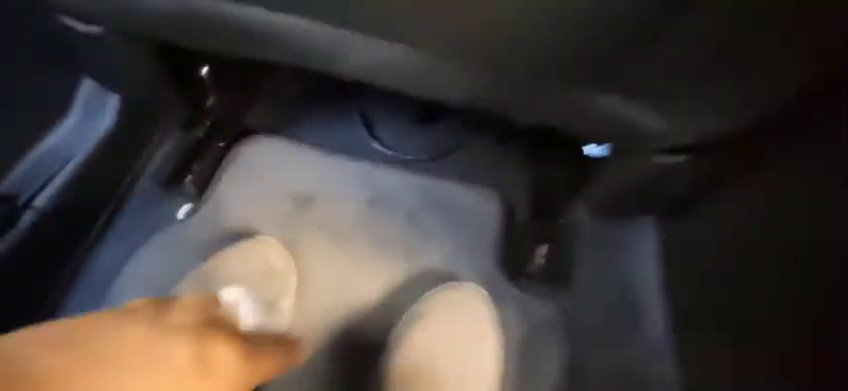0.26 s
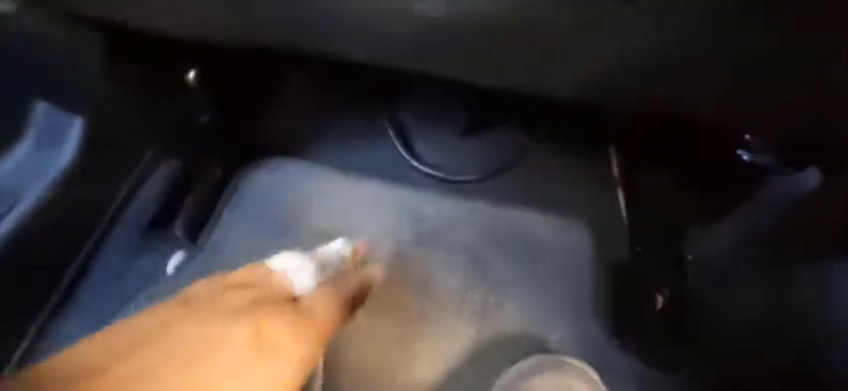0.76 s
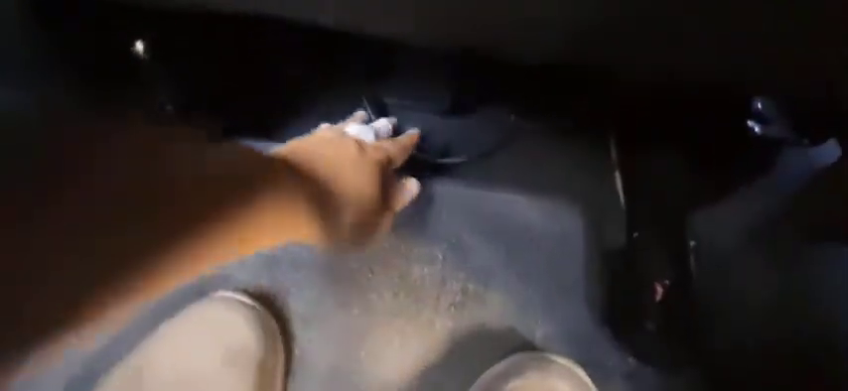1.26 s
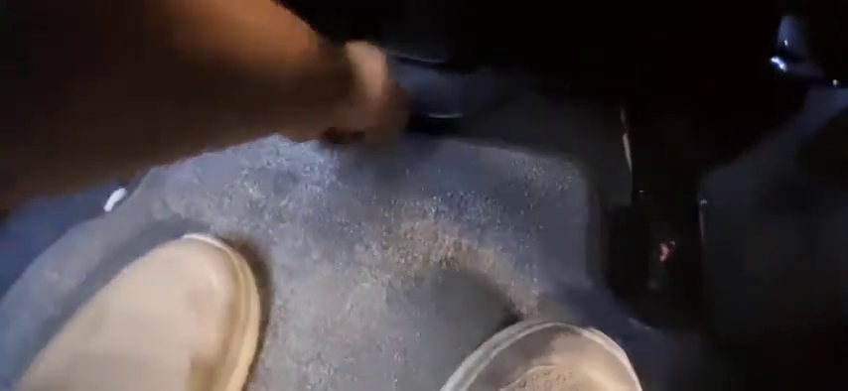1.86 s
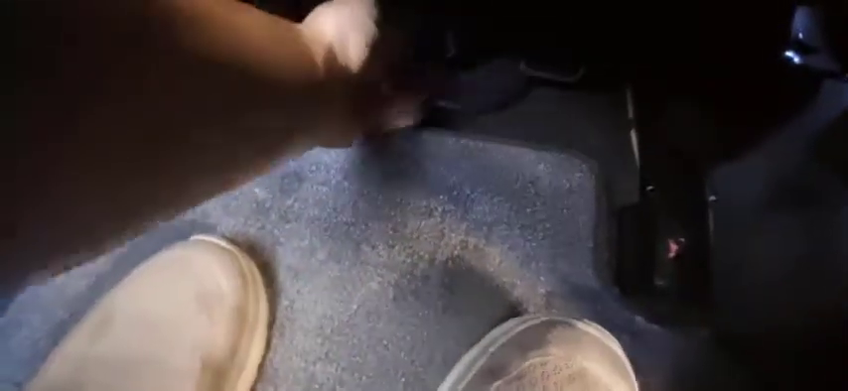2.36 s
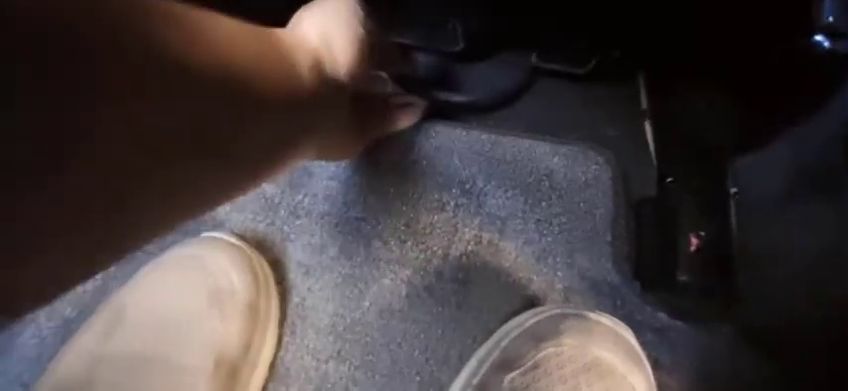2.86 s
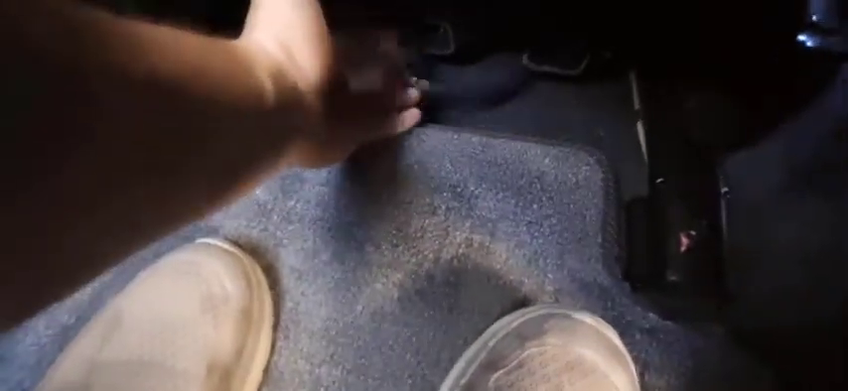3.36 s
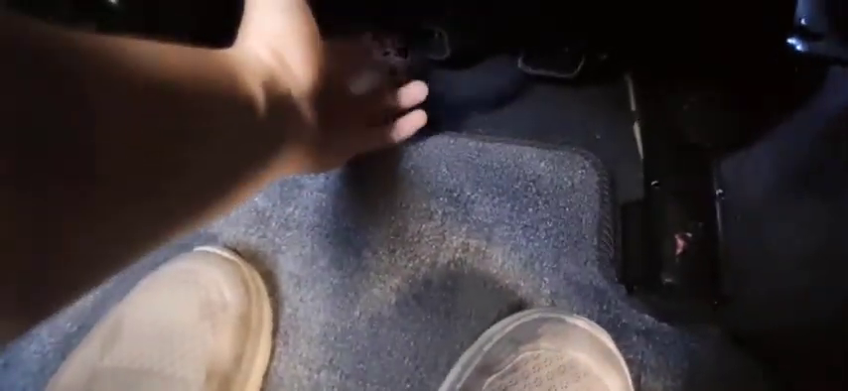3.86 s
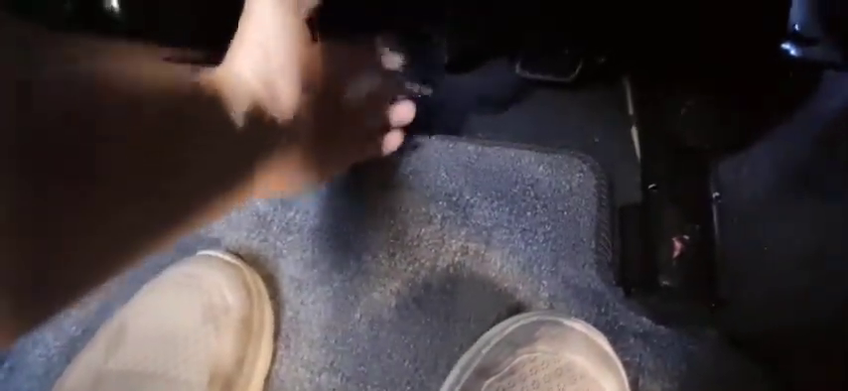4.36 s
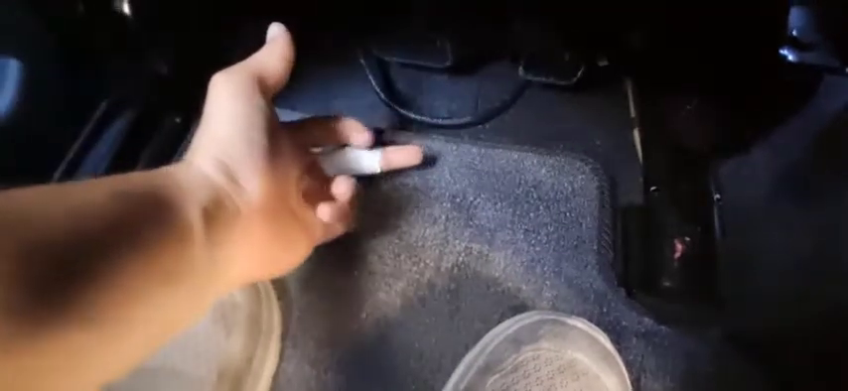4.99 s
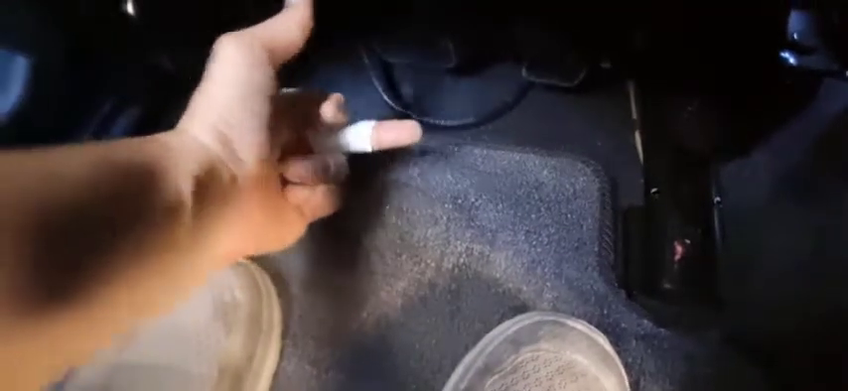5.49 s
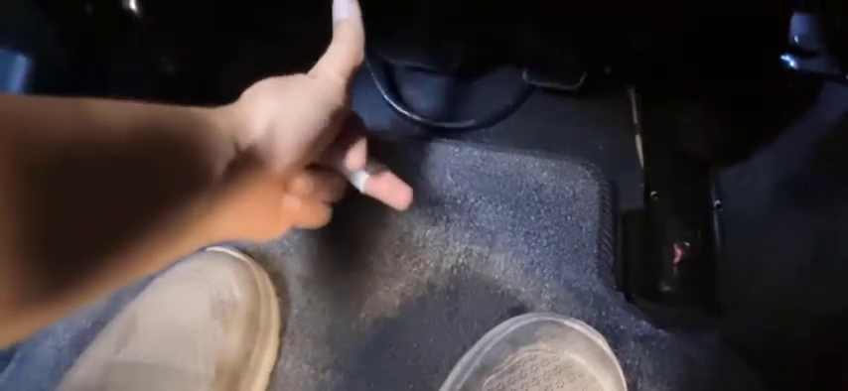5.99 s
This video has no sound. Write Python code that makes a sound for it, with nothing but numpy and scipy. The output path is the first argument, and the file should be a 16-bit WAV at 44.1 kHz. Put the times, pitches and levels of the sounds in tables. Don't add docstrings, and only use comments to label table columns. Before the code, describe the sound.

A small, damped car cabin, heard very close through a handheld stereo microphone. From 0 to 0.6 seconds cloth rubs briskly with a faint tight-fold squeak, over grip rumble and quick low bumps. Between 0.7 and 1.1 come clustered knuckle thuds and small plastic snaps. Fabric keeps brushing until, at about 1.53, a plastic clip lets go with a loud bright crack, with lesser cracks near 1.65 and 1.72. Around 2.08 a strong hollow knock and raspy scrape hit the panel, with a brief metallic ring; more bumps and dragging follow to 2.45. A sleeve strokes softly from 2.5 to 3.25. Dull boomy taps fall at 3.04, 3.32, 3.57, 3.83 and 4.05, with thin clicks between, then the hardest at 4.31. Faint cloth movement fades by 5.9, leaving low hum and hiss, slightly deeper on the left from about 6.

```python
import sys
import numpy as np
from scipy import signal
from scipy.fft import rfft, irfft, next_fast_len
from scipy.io import wavfile
from scipy.ndimage import uniform_filter1d, map_coordinates

SR = 44100
rng = np.random.default_rng(int(sys.argv[2]) if len(sys.argv) > 2 else 0)


def digitize_waveform(pressure):
    field = np.atleast_2d(pressure).T
    bounded = np.clip(field, -1, 1)
    quanta = np.round(bounded * 32767).astype(np.int16)
    wavfile.write(sys.argv[1], SR, quanta)


def amplitude_ratio(level_db):
    exponent = np.asarray(level_db, float) / 20
    return 10 ** exponent


N = 274728
TIME = np.arange(N) / SR


def clock(seconds):
    return np.arange(int(SR * seconds)) / SR


def onset(t, rise_s):
    return 1 - np.exp(-t / rise_s)


def decay(t, t60):
    return amplitude_ratio(-60 * t / t60)


def unit(x):
    return x / np.sqrt(np.mean(x ** 2) + 1e-20)


def along(points, hz):
    f, v = np.transpose(points)
    return np.interp(np.log(hz + 1), np.log(f + 1), v)


def over_time(rows):
    return np.interp(TIME, *np.transpose(rows))


def wobble(rate):
    knots = rng.standard_normal(int(N * rate / SR) + 4)
    return map_coordinates(knots, [np.arange(N) * rate / SR])


def filtered(x, response):
    n = x.shape[-1]
    m = next_fast_len(n + 8192)
    return irfft(rfft(x, m) * response(np.fft.rfftfreq(m, 1 / SR)), m)[..., :n]


def coloured(x, spectrum):
    return unit(filtered(x, lambda hz: amplitude_ratio(along(spectrum, hz))))


def low_cut(x, corner_hz):
    return filtered(x, lambda hz: hz ** 2 / (hz ** 2 + corner_hz ** 2))


def add(track, s, sound):
    part = track[..., round(s * SR):][..., :sound.shape[-1]]
    part += sound[..., :part.shape[-1]]


# frequency in Hz, left-right likeness from -1 to 1.
PORT_LIKENESS = [(60, 0.82), (150, 0.96), (380, 0.72), (950, -0.07), (2380, -0.066), (5980, -0.13),
                 (15000, -0.028)]


def rub(spectrum, patchy_db, grain_db, grain_rate):
    z = signal.stft(rng.standard_normal((2, N)), nperseg=512)[2]
    patches = uniform_filter1d(rng.standard_normal(z.shape[1:]), size=6, axis=0)
    patches = uniform_filter1d(patches, size=10, axis=1)
    pair = signal.istft(z * amplitude_ratio(patchy_db * unit(patches)), nperseg=512)[1][:, :N]
    pair = pair * amplitude_ratio(grain_db * wobble(grain_rate))

    def blend(hz):
        turn = np.arccos(np.clip(along(PORT_LIKENESS, hz), -1, 1)) / 2
        return np.array([np.cos(turn), np.sin(turn)])

    mid, side = filtered(pair, blend)
    return coloured(np.array([mid + side, mid - side]), spectrum)


def ring(modes, t):
    out = 0
    for (hz, db, t60), change_db in zip(modes, 1.5 * rng.standard_normal(len(modes))):
        out = out + amplitude_ratio(db + change_db) * decay(t, t60) * np.sin(2 * np.pi * hz * t)
    return out


# frequency in Hz, width in Hz, level in dB.
TRIM_SHELL = [(304, 98, 9.5), (468, 39, 9), (666, 12, 13.5), (788, 24, -7.5), (970, 60, -12.5),
              (1157, 73, -12), (1450, 55, -6.5), (1640, 32, -11), (2075, 38, -3.5), (2200, 32, -21),
              (2590, 40, -29)]


def hollow(x):
    def shell(f):
        return sum(amplitude_ratio(db) * 1j * f * w / (c * c - f * f + 1j * f * w) for c, w, db in TRIM_SHELL)
    return unit(filtered(x, shell))


def narrow(hz, width_hz):
    slow = rng.standard_normal((2, 2, len(hz)))
    slow = filtered(slow, lambda f: 1 / (1 + (f / width_hz) ** 2))
    phase = 2 * np.pi * np.cumsum(hz) / SR
    return unit(slow[0] * np.cos(phase) + slow[1] * np.sin(phase))


# frequency in Hz, t60 in seconds.
CABIN_T60 = [(100, 0.21), (1000, 0.12), (10000, 0.036)]


def cabin_echo(x):
    hz, t, z = signal.stft(rng.standard_normal((2, SR // 4)), SR, nperseg=256)
    tail = signal.istft(z * decay(t, along(CABIN_T60, hz)[:, None]), SR, nperseg=256)[1]
    return signal.fftconvolve(x, tail / np.linalg.norm(tail[0]), axes=1)[:, :N]


# frequency in Hz, level in dB per Hz.
HISS = [(1470, -50.5), (2500, -3), (5930, -20), (7560, -5.5), (9120, -10.5), (13800, 3.5), (14800, 4),
        (15700, -43), (16300, -61)]


def microphone_hiss():
    return amplitude_ratio(-65.5) * coloured(rng.standard_normal((2, N)), HISS)


# frequency in Hz, level in dB per Hz.
CABIN_HUM = [(12, -53), (20, -28.5), (37, 0), (59, 4), (96, -5), (113, -5.5), (265, -33.5), (400, -60.5),
             (800, -120)]
STILL_AIR = [(250, -30.5), (320, 1), (409, -15.5), (1500, -16.5), (1950, -45), (3300, -90)]


def quiet_cabin():
    hum = amplitude_ratio(-44) * rub(CABIN_HUM, patchy_db=1.0, grain_db=-2.0, grain_rate=12) * amplitude_ratio([[.6], [-.6]])
    lean = np.clip((TIME - 5.95) / 0.16, 0, 1)
    hum = hum * amplitude_ratio(lean * [[3], [0]])
    return hum + amplitude_ratio(-77) * rub(STILL_AIR, patchy_db=2.5, grain_db=2.3, grain_rate=7.8)


STILL_DB = -45
SLEEVE_START_S, SLEEVE_END_S = 2.47, 3.25


def push_shake():
    out = 0
    for s, db, *_ in PUSHES[1:]:
        since = np.clip(TIME - s, 0, None)
        out = out + amplitude_ratio(db - 10) * decay(since, 0.21) * onset(since, 0.006)
    return out


# start in seconds, length in seconds, cloth in dB, fizz over it in dB.
FIDGETS = [(0.599, 0.11, -57.5, 0), (0.713, 0.33, -46, -5), (3.25, 0.2, -67.5, 7.5),
           (3.511, 0.16, -61.5, 3.5), (3.748, 0.39, -70, 6.5), (4.158, 0.2, -67, 11),
           (4.296, 0.15, -65, 2.5), (4.424, 1.475, -86, 16.5), (4.59, 0.4, -72, 4.5),
           (5.264, 0.26, -97.5, 25.5), (5.788, 0.097, -78.5, 5)]


def fidgets():
    out = 0
    for s, length, db, fizz_db in FIDGETS:
        rise = np.clip((TIME - s) / 0.037, 0, 1)
        fall = np.exp(-np.clip(TIME - s - length, 0, None) / 0.028)
        out = out + amplitude_ratio([[db], [db + fizz_db]]) * rise * fall
    return out


# time in seconds, level in dB.
GRIP = [(0, -26), (.17, -33), (.36, -25.5), (.42, -29.5), (.53, -25), (.6, -42.5), (.9, -29.5),
        (1.0, -39.5), (1.25, -41), (1.36, -34.5), (1.6, -37.5), (1.92, -30.5), (2.04, -49.5), (2.16, -24.5),
        (2.3, -44.5), (2.67, -48), (3.25, -50), (6.23, -60.5)]
# frequency in Hz, level in dB per Hz.
RUMBLE = [(12, -44.5), (20, -20.5), (37, -0.5), (64, 3.5), (81, 3), (122, 1), (189, -6.5), (400, -28),
          (520, -45), (880, -120)]


def grip_rumble():
    return (amplitude_ratio(over_time(GRIP)) + push_shake()) * rub(RUMBLE, patchy_db=1.0, grain_db=1.5, grain_rate=92)


# time in seconds, level in dB.
ARM = [(0, -41.5), (.08, -40), (.15, -33.5), (.36, -29.5), (0.543, -36), (0.611, -58.5), (1.1, -48.5),
       (1.36, -41.5), (1.84, -40), (1.9, -44.5), (2.2, -48.5), (2.23, -56), (2.315, -62), (2.342, -46.5),
       (2.47, -55.5), (2.67, -48.5), (3.04, -47.5), (3.22, -55), (3.4, -71.5)]
# frequency in Hz, level in dB per Hz.
SEAT_BODY = [(150, -23.5), (250, 2), (334, -7), (472, -5.5), (675, -11.5), (896, -13.5), (1300, -20.5),
             (1690, -51.5), (2860, -120)]


def seat_body():
    db = -51.5 + 0.4 * (over_time(GRIP) - STILL_DB) + 0.66 * (over_time(ARM) - STILL_DB)
    clear = np.clip(TIME - SLEEVE_START_S, 0, .2) / 0.25 * (TIME < SLEEVE_END_S)
    strength = amplitude_ratio(db - 10.5 * clear) + amplitude_ratio(-5.0) * fidgets()[0] + amplitude_ratio(-15.5) * push_shake()
    return strength * rub(SEAT_BODY, patchy_db=1.0, grain_db=2.5, grain_rate=35)


# frequency in Hz, level in dB per Hz.
CLOTH = [(530, -3.5), (850, -10.5), (1150, -5), (1490, -1), (1760, -2.5), (2130, 0), (2350, -2.5),
         (4330, -4.5), (5240, -5), (6500, -7.5), (8450, -33), (14300, -120)]
SLEEVE = [(530, -55), (900, -33), (1380, -19.5), (2750, -14.5), (3040, -10), (3300, -13), (3520, -10),
          (3830, -15), (4990, -14), (6500, -20.5), (8450, -26), (14300, -120)]
# frequency in Hz, level in dB.
TUCKED = [(500, 0), (800, -7), (1200, -7.5), (1700, 0)]


def rubbing_cloth():
    from_ends = np.minimum(TIME - SLEEVE_START_S, SLEEVE_END_S - TIME)
    stroke = np.clip(from_ends / 0.012, 0, 1)
    cloth = rub(CLOTH, patchy_db=1.3, grain_db=1.5, grain_rate=90) * np.sqrt(1 - stroke)
    cloth = cloth + rub(SLEEVE, patchy_db=1.0, grain_db=1.5, grain_rate=120) * np.sqrt(stroke)
    small = filtered(fidgets()[0] * cloth, lambda hz: amplitude_ratio(along(TUCKED, hz)))
    return amplitude_ratio(over_time(ARM)) * cloth + small


# frequency in Hz, level in dB per Hz.
FIZZ = [(2940, -46.5), (5000, -10), (5740, -13), (7170, -2), (8040, -2.5), (8660, -7.5), (9750, -12),
        (12400, -7.5), (15100, -5), (16000, -24), (16300, -43)]


def fibre_fizz():
    strength = amplitude_ratio(-49.5 + over_time(ARM) - STILL_DB) + fidgets()[1]
    return strength * rub(FIZZ, patchy_db=1.5, grain_db=1.0, grain_rate=170)


# time in seconds, level in dB, pitch in Hz.
FOLD = [
    (0.0, -41, 1182),
    (0.058, -43.5, 1369),
    (0.316, -39, 1360),
    (0.338, -33, 1432),
    (0.472, -33, 1366),
    (0.548, -38, 1445),
    (0.58, -55, 1440),
]


def cloth_fold():
    out = np.zeros((2, N))
    s, db, hz = np.transpose(FOLD)
    t = np.arange(round(s[-1] * SR)) / SR
    fade = np.clip((s[-1] - t) / .03, 0, 1)
    add(out, 0, amplitude_ratio(np.interp(t, s, db) - 5.5) * fade * narrow(np.interp(t, s, hz), width_hz=240))
    return out


# start in seconds, level in dB, pitch in Hz, t60 in seconds.
CHIRPS = [(2.006, -34, 1460, 0.056), (2.053, -41, 2075, 0.27), (2.081, -35, 4600, 0.03),
          (2.232, -47.5, 2130, 0.038), (2.396, -33.5, 1610, 0.044), (2.421, -46, 2590, 0.06),
          (2.486, -42.5, 2200, 0.031), (2.64, -49, 3600, 0.19), (2.701, -47, 3630, 0.1),
          (2.702, -37, 4970, 0.033), (2.81, -48, 4720, 0.04), (3.004, -38.5, 4970, 0.04)]


def skin_chirps():
    out, t = np.zeros((2, N)), clock(1 / 4)
    for s, db, hz, t60 in CHIRPS:
        pair = narrow(np.full(len(t), hz), width_hz=90)
        add(out, s, amplitude_ratio(db) * decay(t, t60) * onset(t, .003) * (pair[0] + 0.92 * pair))
    return out


# frequency in Hz, level in dB per Hz.
DULL = [(1000, -15.5), (1500, -11), (1950, 3.5), (2300, -7.5), (2750, 2.5), (3400, -16), (4500, -28.5)]
EDGE = [(6000, -32), (9000, 4.5), (14500, -11.5), (16000, -27.5)]


def plastic_tick(colour, db, hollow_db, edge_db, pan_db, t60):
    t = clock(1 / 4)
    noise = rng.standard_normal((3, len(t)))
    both = noise[0] + noise[1:]
    fade = decay(t, t60) * np.clip(t / .0012, 0, 1)

    def part(spectrum):
        return unit(coloured(both, spectrum) * fade) * np.sqrt(np.mean(fade ** 2))

    tick = part(colour) + amplitude_ratio(hollow_db + 13.0) * part(DULL) + amplitude_ratio(edge_db) * part(EDGE)
    return amplitude_ratio(db - 2.5) * tick * amplitude_ratio([[pan_db / 2 - 0.5], [-pan_db / 2 - 6.0]])


# frequency in Hz, level in dB per Hz.
SNAP = [(1470, -25), (2500, -45), (3730, -20.5), (4070, -13), (5060, -10), (6930, -16.5), (7920, -0.5),
        (8700, -29), (12400, -14), (16300, -24.5)]
# start in seconds, peak in dB, hollow part in dB, left-right in dB.
SNAPS = [(0.7458, -37, -3, -24.5), (0.763, -46, 1.5, -11), (0.802, -48, -2.5, -22),
         (0.8655, -24.5, -26, -1), (0.908, -31.5, -13, -10.5), (0.938, -41, 12.5, -13.5),
         (0.9774, -40, 5.5, -6), (1.134, -42.5, -11.5, -27), (1.15, -43.5, -0.5, -27.5),
         (1.3746, -37.5, -5, -30.5), (1.512, -50, 1.5, -23.5), (1.6378, -26.5, -12.5, -11),
         (1.7272, -29.5, -12.5, 1), (2.005, -38.5, -8, 4), (2.52, -42.5, -11.5, -20.5),
         (2.7024, -28, -16, -10), (2.812, -56, -17.5, -6.5), (4.049, -57.5, -14.5, -44),
         (4.0674, -34.5, -13.5, 4.5)]


def trim_snaps():
    out = np.zeros((2, N))
    for s, db, hollow_db, pan_db in SNAPS:
        add(out, s, plastic_tick(SNAP, db, hollow_db, -22, pan_db, t60=0.014))
    return out


# start in seconds, peak in dB, hollow part in dB, left-right in dB.
CRACKS = [
    (1.5325, -6.5, -16.5, -5.5),
    (1.54, -12.5, -9, -2.5),
    (1.65, -16, -16.5, 2.5),
    (1.724, -17.5, -16, -12),
]


def clip_cracks():
    out = np.zeros((2, N))
    for s, db, hollow_db, pan_db in CRACKS:
        add(out, s, plastic_tick(SNAP, db, hollow_db, -23, pan_db, t60=0.017))
    return out


# frequency in Hz, level in dB per Hz.
PEEL = [(1470, -27), (2500, -33), (3730, -8), (5060, -9.5), (6930, -6.5), (7920, 4.5), (9000, -18),
        (12400, -15), (16300, -21)]
# start in seconds, peak in dB, edge in dB, left-right in dB.
PEELS = [(1.9024, -33, -0.5, -5.5), (2.4864, -33.5, -11, -6), (2.644, -45, -17, -9), (2.848, -45, -5, -9),
         (2.896, -39.5, -15, -11), (3.005, -40, -10.5, -8), (3.0935, -31, -14, -6.5),
         (3.2693, -41.5, -10, -13), (3.399, -49.5, 3.5, -14), (3.4073, -34.5, -8.5, -5),
         (3.5216, -41.5, -8.5, -10), (3.6191, -40.5, 2, -1), (3.64, -35, -2.5, -6.5), (3.769, -46, 1, -5.5),
         (3.886, -37.5, -1.5, -7.5), (4.0103, -43.5, -4, 3), (4.1973, -35.5, -4, -4.5)]


def fingertip_peels():
    out = np.zeros((2, N))
    for s, db, edge_db, pan_db in PEELS:
        add(out, s, plastic_tick(PEEL, db, -34, edge_db, pan_db, t60=0.026))
    return out


# start in seconds, level in dB, pitch in Hz, t60 in seconds.
CLIP_RINGS = [(2.004, -35, 7380, 0.11), (2.085, -36, 7300, 0.14), (2.095, -37, 7800, 0.11),
              (2.487, -55, 7300, 0.28), (1.5335, -8, 7920, 0.024), (1.5405, -28, 7950, 0.021),
              (3.408, -58, 7000, 0.13), (3.640, -53.5, 7160, 0.36), (3.769, -57, 7400, 0.22),
              (3.887, -47.5, 7210, 0.15), (4.198, -53, 7280, 0.13)]


def clip_rings():
    out, t = np.zeros((2, N)), clock(1 / 4)
    for s, db, hz, t60 in CLIP_RINGS:
        add(out, s, amplitude_ratio(db) * ring([(hz, 0, t60)], t) * onset(t, 0.0023))
    return out


# start in seconds, peak in dB, pitch in Hz, t60 in seconds.
BUMPS = [(0.003, -15, 85, 0.045), (0.038, -14, 96.5, 0.094), (0.214, -17, 107, 0.072),
         (0.243, -6.5, 98, 0.038), (0.31, -12.5, 110.5, 0.06), (0.334, -12, 115, 0.092),
         (0.401, -15.5, 120, 0.053), (0.474, -13.5, 81, 0.1), (0.508, -16.5, 101, 0.079),
         (0.539, -18.5, 70.5, 0.2), (0.686, -8.5, 103, 0.044), (0.738, -9.5, 107, 0.035),
         (0.778, -22, 87, 0.037), (0.80, -19, 123, 0.074), (0.845, -13, 143, 0.031), (0.861, -10, 88, 0.04),
         (0.895, -15, 95, 0.05), (0.937, -6, 88.4, 0.072), (0.977, -22, 115, 0.13),
         (0.998, -9.5, 95, 0.046), (1.033, -13.5, 77, 0.069), (1.305, -28.5, 98, 0.2),
         (1.638, -15.5, 150, 0.046), (1.677, -19, 173, 0.053), (1.824, -19, 95, 0.1),
         (1.897, -31, 137, 0.092), (2.034, -29.5, 135, 0.33), (2.05, -16.5, 166, 0.063),
         (2.114, -14, 121.6, 0.086), (2.104, -12, 146, 0.043), (2.303, -20.5, 153, 0.04),
         (2.333, -18.5, 132, 0.058), (2.349, -10, 115, 0.091), (2.381, -11, 108, 0.062),
         (2.408, -8, 108, 0.047), (2.436, -18.5, 120, 0.09), (2.488, -28.5, 86.8, 0.22),
         (4.3444, -17, 135, 0.041), (6.217, -39.5, 80, 0.3), (3.28, -49, 108, 0.03),
         (3.412, -28.5, 79, 0.12)]


def bumps():
    out, t = np.zeros(N), clock(1 / 3)
    for s, db, hz, t60 in BUMPS:
        thud = decay(t, t60) * onset(t, 0.0025) ** 2 * np.sin(2 * np.pi * hz * t)
        add(out, s, -amplitude_ratio(db + 1.5) * thud)
    return out


# start in seconds, peak in dB, pitch in Hz.
KNUCKLES = [(0.002, -25.5, 522), (0.032, -20, 550), (0.615, -33.5, 280), (0.799, -27.5, 400),
            (0.915, -17, 322), (2.551, -30.5, 302), (2.86, -44.5, 600), (0.733, -23, 361),
            (0.745, -37.5, 500), (0.852, -26.5, 450), (0.892, -28.5, 400), (0.933, -21, 297),
            (0.975, -16, 300), (1.305, -36, 330), (1.87, -25, 412), (2.05, -20.5, 280), (2.111, -28.5, 300),
            (2.438, -33.5, 378), (2.49, -32.5, 299), (3.279, -34, 290.5), (3.409, -32.5, 300),
            (3.445, -47, 490), (3.655, -51.5, 540), (3.968, -37.5, 232)]


def knuckles():
    out, t = np.zeros(N), clock(1 / 3)
    padded = [(s, db - 26, 300) for s, db, *_ in BUMPS]
    for s, db, hz in list(KNUCKLES) + padded:
        spectrum = [(hz / 2, -36.0), (hz, -1), (2 * hz, -6.0), (4 * hz, -28)]
        dull = coloured(rng.standard_normal(len(t)), spectrum)
        add(out, s, amplitude_ratio(db - 7) * decay(t, 0.056) * onset(t, 0.0051) * dull)
    return out


# start in seconds, peak in dB, final pitch in Hz, extra pitch at first
THUNKS = [(0.036, -29, 527, 0.5), (0.735, -27, 397, 0.5), (0.800, -30.5, 330, 1.2), (0.855, -30, 347, 1.8),
          (0.893, -32, 320, 1.2), (0.914, -27.5, 320, 1.4), (0.937, -31, 350, 1.4), (0.975, -26, 330, 1.4),
          (2.0887, -9.5, 135, 0.1), (2.101, -17.5, 330, 0.5), (3.970, -38.5, 240, 2.2),
          (4.3112, -18.5, 500, 0.8)]


def thunks():
    out, t = np.zeros(N), clock(1 / 10)
    sag_s = 0.004
    for s, db, hz, extra in THUNKS:
        turns = hz * (t + extra * sag_s * onset(t, sag_s))
        add(out, s, -amplitude_ratio(db) * decay(t, 0.035) * onset(t, 0.0014) * np.sin(2 * np.pi * turns))
    return out


# frequency in Hz, level in dB, t60 in seconds.
PANEL = [(77, -2, 0.061), (115, -1, 0.15), (135, -28, 0.034), (215, -14, 0.13), (312.6, -18, 0.13)]
# frequency in Hz, level in dB per Hz.
GRIT = [(700, -18), (1500, 0), (3000, -7), (5000, -10), (7500, -14.5), (10000, -37), (16000, -11)]
# start in seconds, length in seconds, boom in dB, rasp in dB, grit in dB.
SCRAPES = [
    (1.988, 0.019, -48.5, -24, -39.5),
    (2.002, 0.0057, -57, -37, -34.5),
    (2.07, 0.021, -50.5, -22.5, -44.5),
    (2.084, 0.013, -48, -17, -45),
    (2.089, 0.0086, -62, -29.5, -38),
    (2.329, .1, -55, -36.5, -48),
    (2.423, 0.043, -50.5, -48.5, -67),
    (4.323, 0.027, -66, -59.5, -49),
]


def scrapes():
    out, t = np.zeros((2, N)), clock(1 / 3)
    for s, length, boom_db, rasp_db, grit_db in SCRAPES:
        stroke = np.minimum(1, decay(t - length, 0.084)) * np.clip(t / (.12 * length), 0, 1)
        boom = signal.fftconvolve(stroke * rng.standard_normal(len(t)), ring(PANEL, t))[:len(t)]
        jumps_db = 3 * np.repeat(rng.standard_normal(len(t)), 90)[:len(t)]
        slips = rng.standard_normal((2, len(t))) * amplitude_ratio(jumps_db)
        rasp = amplitude_ratio(rasp_db) * hollow(slips) + amplitude_ratio(grit_db) * coloured(slips, GRIT)
        add(out, s, amplitude_ratio(boom_db) * np.sqrt(t[-1] / length) * unit(boom) + rasp * stroke)
    return out


# start in seconds, peak in dB, push pitch in Hz, ring in dB, ring pitch in Hz.
PUSHES = [
    (2.0898, -6.5, 139, -13.5, 130.8),
    (3.0418, -19.5, 152, 1.5, 119.2),
    (3.324, -15, 168, -3, 115),
    (3.5752, -10, 150.3, -5, 104),
    (3.833, -17, 139, 4.5, 122.6),
    (4.0551, -20.5, 135, 3.5, 122.5),
    (4.3109, -3.5, 158.2, -21, 122),
]


def booms():
    out, t = np.zeros(N), clock(1 / 3)
    push_s = 0.0028
    for s, db, hz, ring_db, ring_hz in PUSHES:
        swell = (t / push_s) ** 3 * np.exp(-t / push_s)
        blow = -np.sin(2 * np.pi * hz * t) * swell / swell.max()
        blow = blow - .5 * amplitude_ratio(db) * blow ** 2
        tail = -ring(PANEL, t * ring_hz / PANEL[1][0]) * onset(t, 2 * push_s) ** 2
        add(out, s, amplitude_ratio(db) * (blow + amplitude_ratio(ring_db + 3) * tail))
    return out


# frequency in Hz, level in dB, t60 in seconds.
TRIM = [(240, 4, 0.06), (330, -11, 0.056), (450, -5, 0.036), (675, -7.5, 0.06), (980, -13, 0.056),
        (1173, -16.5, 0.048), (1632, -11.5, 0.03), (2046, -20, 0.063), (2190, -32, 0.036)]
# frequency in Hz, level in dB per Hz.
SKIN = [(800, -12), (1600, 3.5), (3000, -9.5), (5000, -14), (7500, -6), (10000, -16.5), (16000, -25.5)]
# start in seconds, knock in dB, skin in dB, ring in dB, ring tilt in dB per
TAPS = [
    (1.99, -42, -49, -30, 7),
    (2.0756, -12, -41, -16, 4),
    (3.04, -35.5, -37, -45, 2),
    (3.326, -31, -32.5, -27.5, 3.5),
    (3.574, -30, -34.5, -27, 4),
    (3.833, -33, -48.5, -31.5, 3.5),
    (4.053, -30.5, -41.5, -37, 1),
    (4.311, -14, -37.5, -15, -6.5),
]


def taps():
    out, t = np.zeros((2, N)), clock(1 / 3)
    for s, knock_db, skin_db, ring_db, tilt_db in TAPS:
        noise = rng.standard_normal((4, len(t)))
        struck = -hollow(np.exp(-((t - .0011) / 0.00037) ** 2))
        rattle = hollow(noise[0] + 7.1 * noise[:2]) * decay(t, 0.07) * onset(t, 0.00074)
        knock = filtered(amplitude_ratio(-32.0) * struck + amplitude_ratio(-2) * rattle, lambda hz: (900 / (900 + 1j * hz)) ** 2)
        modes = []
        for hz, db, t60 in TRIM:
            detune = 1 + 0.02 * rng.standard_normal()
            modes.append((hz * detune, db + tilt_db * np.log2(hz / 500), t60))
        ringing = -ring(modes, t) * onset(t, 0.0033)
        skin = coloured(noise[2:], SKIN) * decay(t, 0.1) * onset(t, 0.00054)
        add(out, s, amplitude_ratio(knock_db) * knock + amplitude_ratio(ring_db) * ringing + amplitude_ratio(skin_db - 2.0) * skin)
    return out


def scene():
    panel = taps() + booms() + scrapes()
    panel = panel + amplitude_ratio(-10.0) * low_cut(cabin_echo(panel), 400)
    ticks = trim_snaps() + clip_cracks() + fingertip_peels() + clip_rings()
    panel = panel + ticks + amplitude_ratio(-5.0) * cabin_echo(ticks)
    mid, side = (panel[0] + panel[1]) / 2, (panel[0] - panel[1]) / 2
    side = low_cut(side, 450)
    panel = np.array([mid + side, mid - side])
    background = quiet_cabin() + microphone_hiss()
    handling = grip_rumble() + seat_body() + rubbing_cloth() + fibre_fizz()
    contacts = bumps() + knuckles() + thunks() + skin_chirps() + cloth_fold()
    return background + handling + contacts + panel


def roll_off(x):
    return signal.sosfilt(signal.butter(12, 16660, fs=SR, output="sos"), x)


# frequency in Hz, left-right in dB.
PORTS = [(60, 1), (130, 2.5), (290, 0), (640, 0), (1410, -1.5), (3100, -6.5), (6820, -11.5), (15000, -1.5)]


def record(dry):
    def microphone(hz):
        ports = amplitude_ratio(along(PORTS, hz) / 2 * np.array([[1], [-1]]))
        bass_cut = (1j * hz / (45 + 1j * hz)) ** 2
        return ports * bass_cut * (hz < 16250)

    mix = filtered(dry, microphone)
    return roll_off(mix)


dry = scene()
out = record(dry)
digitize_waveform(out)
```